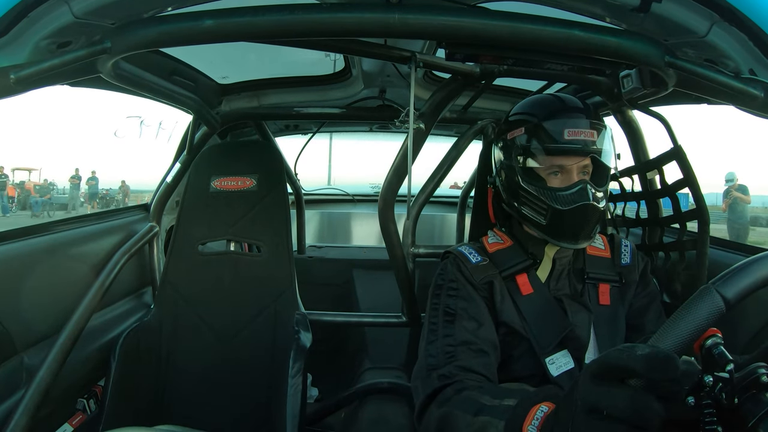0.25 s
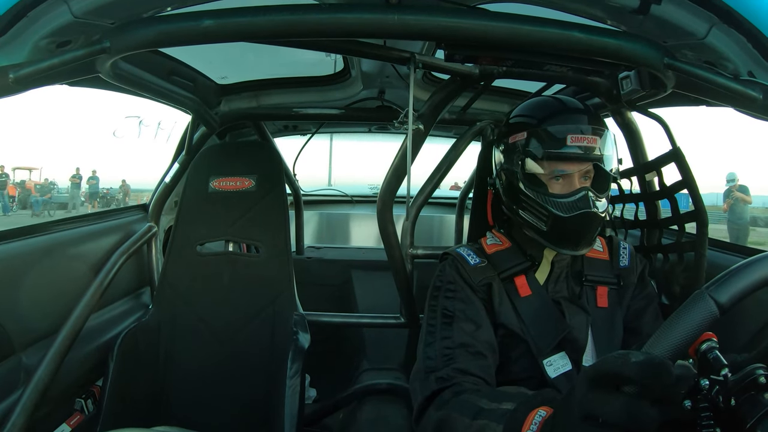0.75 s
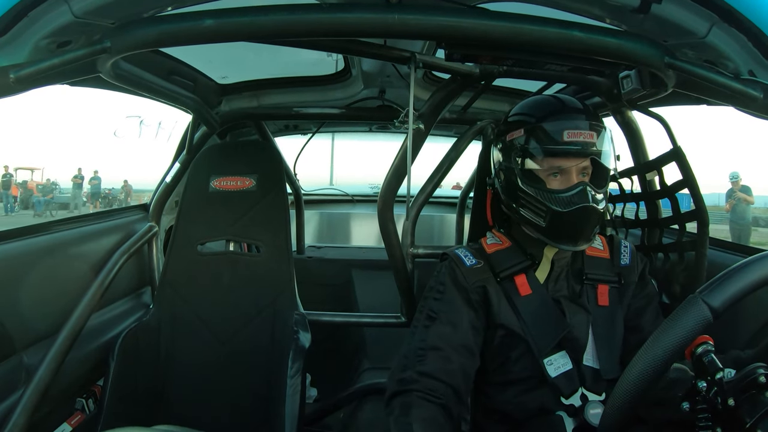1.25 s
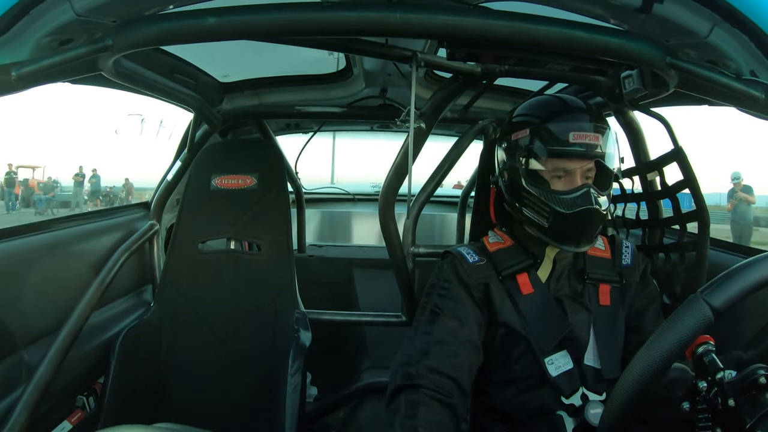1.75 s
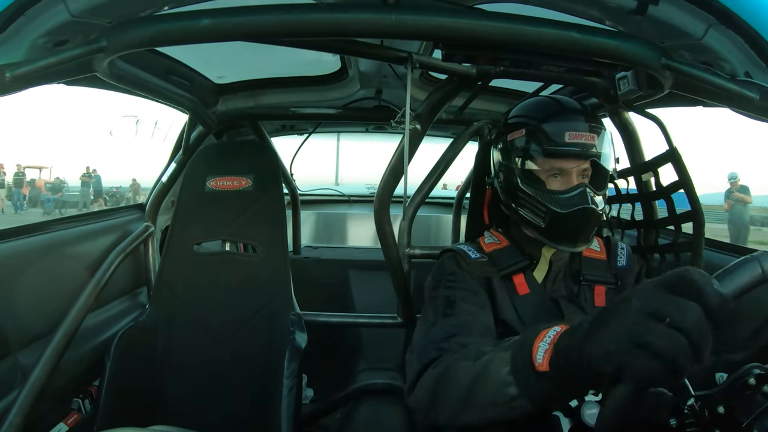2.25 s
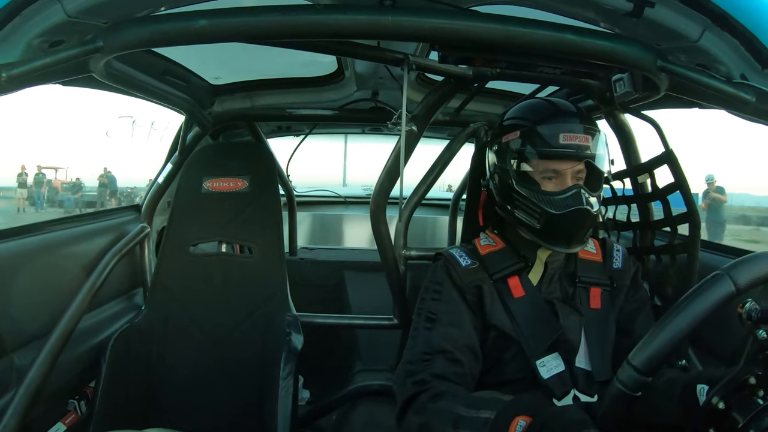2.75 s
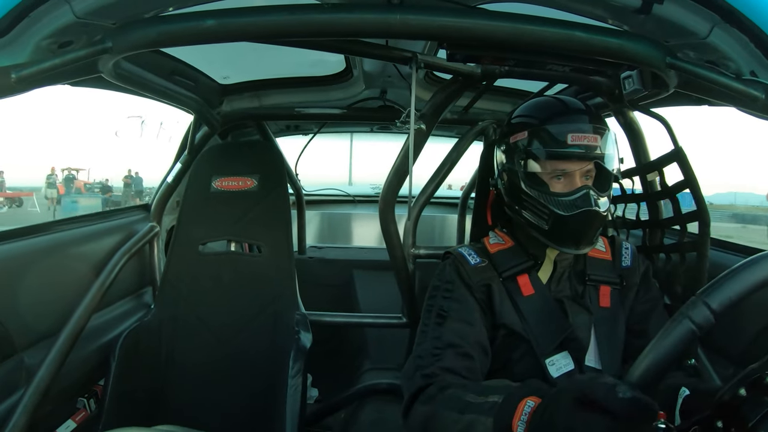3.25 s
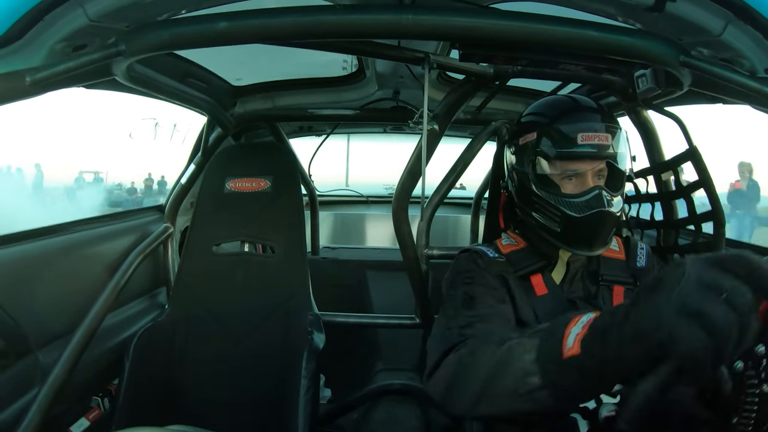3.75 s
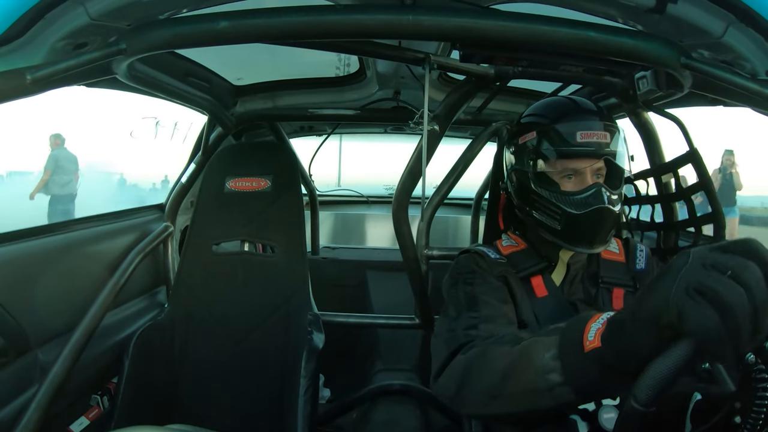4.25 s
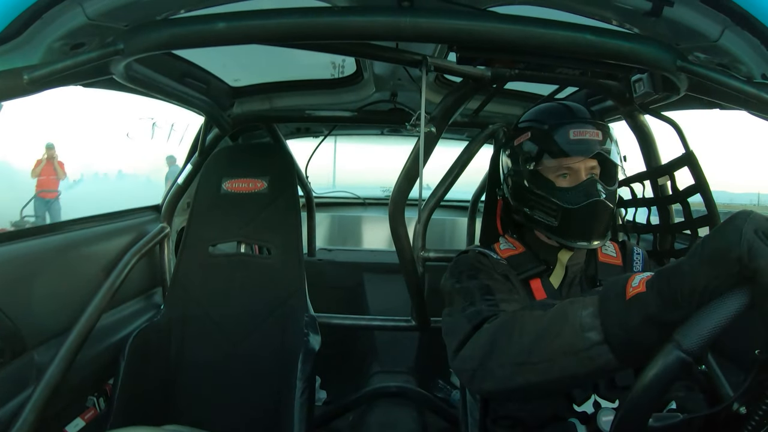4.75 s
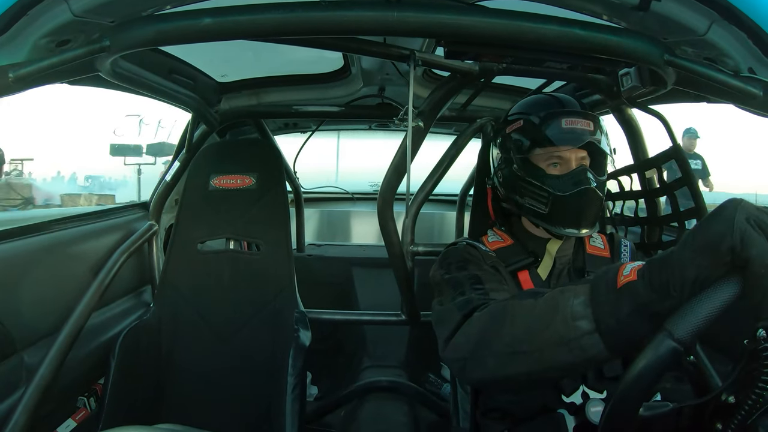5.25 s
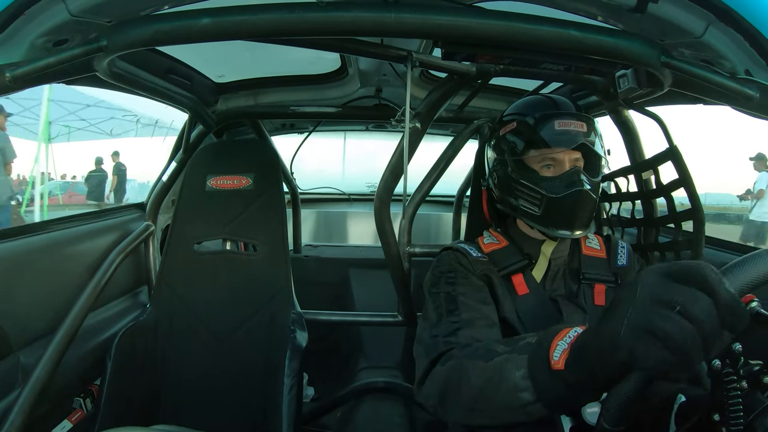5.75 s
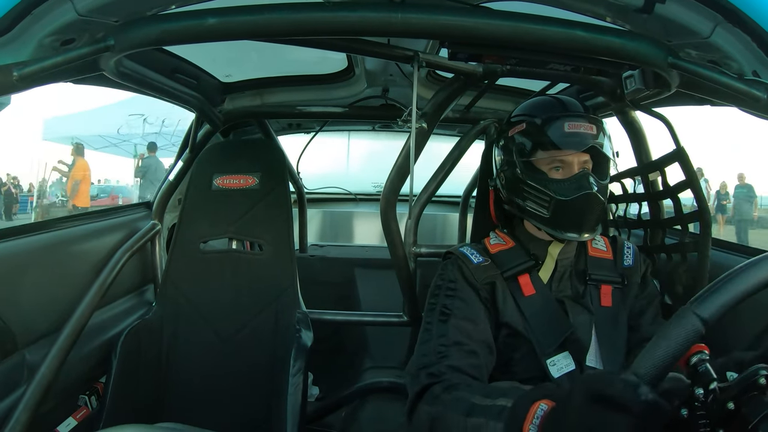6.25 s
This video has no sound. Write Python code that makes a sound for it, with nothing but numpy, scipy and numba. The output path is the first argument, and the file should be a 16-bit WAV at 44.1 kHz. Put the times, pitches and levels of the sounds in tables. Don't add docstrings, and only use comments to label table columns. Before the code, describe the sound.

A small microphone in a bare, ringing car cabin catches a lumpy V8 revving up fast, turbo whistle sweeping above it. Heavy floor jolts, snapping trim and hissing tyres join as revs dip and build again. After a last surge comes the lift: clustered rattles, a chirp and rush of air, falling revs, soft exhaust burbles, then uneven idle with faint pump whirr and a falling whistle.

```python
import sys
import numpy as np
from scipy import signal
from scipy.fft import rfft, irfft
from scipy.io import wavfile
from scipy.ndimage import uniform_filter1d
from numba import njit

SR = 44100
rng = np.random.default_rng(int(sys.argv[2]) if len(sys.argv) > 2 else 0)


def gain_from_db(level_db):
    decades = np.asarray(level_db, float) / 20
    return 10 ** decades


def file_out(sig):
    cols = np.atleast_2d(sig).T
    lim = np.clip(cols, -1, 1)
    pcm = np.round(lim * 32767).astype(np.int16)
    wavfile.write(sys.argv[1], SR, pcm)


N = 286650


def noise():
    return rng.standard_normal(N)


def unit(x):
    return x / np.sqrt(np.mean(x ** 2))


def curves(table):
    s, *columns = np.transpose(table)
    return [np.interp(np.arange(N) / SR, s, c) for c in columns]


def gate(table, fade_s=0.016):
    t = np.arange(N) / SR
    return np.clip(np.minimum(t - table[0][0], table[-1][0] - t) / fade_s, 0, 1)


def walk(rate):
    hold = int(SR / rate)
    levels = np.repeat(rng.standard_normal(N // hold + 1), hold)
    return 1.3 * uniform_filter1d(uniform_filter1d(levels, hold), hold)[:N]


@njit
def band(x, hz, width):
    y, b, l = np.empty(len(x)), 0., 0.
    for i in range(len(x)):
        g, k = np.tan(np.pi * hz[i] / SR), width / hz[i]
        v = (b + g * (x[i] - l)) / (1 + g * (g + k))
        b, l, y[i] = 2 * v - b, l + 2 * g * v, k * v
    return y


def ring(x, hz, width):
    return band(x, np.full(len(x), float(hz)), float(width))


def coloured(spectrum, flicker_db, rate):
    hz, db = np.transpose(spectrum)
    octave = np.log2(np.maximum(np.fft.rfftfreq(N, 1 / SR), 1))
    shaped = rfft(noise()) * gain_from_db(np.interp(octave, np.log2(hz), db, left=-120, right=-120))
    out = 0
    for centre in np.arange(np.log2(hz[0]), np.log2(hz[-1]) + .5, .5):
        part = irfft(shaped * np.clip(1 - 2 * abs(octave - centre), 0, 1), N)
        out = out + part * gain_from_db(flicker_db * walk(rate))
    return unit(out)


# time [s], load [dB], airflow [dB].
EFFORT_CURVE = [(0.04, -18, -57), (0.2, -17.5, -56), (0.68, -16.5, -55), (0.91, -15.5, -52.5),
                (1.2, -14.5, -52), (1.51, -14, -45), (1.92, -16, -51), (2.12, -16, -49.5),
                (3.17, -16.5, -50), (3.74, -15.5, -48), (4.32, -16.5, -50), (4.34, -18, -52.5),
                (4.52, -25.5, -46.5), (4.87, -31.5, -55.5), (4.94, -38.5, -59), (5.69, -29, -60),
                (6.06, -28.5, -58.5), (6.42, -30, -63)]


def effort(full_db, per_load_db, per_air_db):
    load_db, air_db = curves(EFFORT_CURVE)
    return full_db + per_load_db * (load_db + 15) + per_air_db * (air_db + 48)


def hiss_level():
    return effort(-45, 0.022, 0.94)


# time [s], four-stroke cycle rate [Hz].
CYCLE_RATE = [(0.0, 26.5), (0.27, 27.7), (0.6, 28.7), (0.72, 30.0), (0.9, 36.6), (1.27, 45.8), (1.36, 47.8),
              (1.53, 49.2), (1.6, 42.6), (1.78, 41.0), (2.06, 32.2), (2.27, 31.1), (2.5, 35.1),
              (2.83, 38.3), (3.15, 38.7), (3.62, 40.6), (4.1, 46.5), (4.18, 45.9), (4.42, 42.0),
              (4.68, 25.5), (5.03, 16.2), (6.5, 17.3)]


def speed():
    late_s = np.maximum(np.arange(N) / SR - 5.03, 0)
    hunt_hz, period_s, fade_s = 2.4, 1.17, 2
    return curves(CYCLE_RATE)[0] - hunt_hz * np.sin(2 * np.pi * late_s / period_s) * np.exp(-late_s / fade_s)


def trend(hz, window):
    return uniform_filter1d(np.gradient(np.log(hz)) * SR, size=window)


def raggedness(hz):
    return np.clip(-trend(hz, SR // 4) - .7, 0, 1)


def crank(hz):
    cycle = np.cumsum(hz * (1 + (.003 + .06 * raggedness(hz)) * walk(25))) / SR
    loud_firing_s = 3.0685
    return cycle - cycle[int(loud_firing_s * SR)] % 1


def pump():
    out = 0
    for hz, width_hz, db in ((2610, 700, -54), (1360, 140, -60)):
        whirr = unit(ring(ring(noise(), hz, width_hz), hz, width_hz))
        out = out + gain_from_db(db + 1.7 * walk(27)) * whirr
    return out


# time [s], level [dB].
FLOOR_JOLTS = [
    (.81, -27.5),
    (1.54, -15.5),
    (1.99, -17),
    (2.39, -17),
    (3.17, -28),
    (3.73, -18.5),
    (4.291, -26.5),
    (4.58, -12.5),
    (4.85, -45),
    (6.1, -33),
]


def floor_pan():
    t = np.arange(N) / SR
    rolling_s, standing_db_per_s, rise_s, fall_s = 1, 16, 0.034, 0.11
    level = gain_from_db(-31 + standing_db_per_s * np.minimum(t - rolling_s, 0))
    for s, db in FLOOR_JOLTS:
        level = level + gain_from_db(db) * np.exp(-np.maximum((s - t) / rise_s, (t - s) / fall_s))
    return level * unit(ring(ring(noise(), 38, 40), 38, 53))


FIRING_SIZE = (1.5, .3, .8, 1.0, .2, .8, .35, .25)


def firings(cycle):
    slot = (8 * cycle).astype(int)
    return slot, np.array(FIRING_SIZE)[slot % 8]


# frequency [Hz], level per Hz [dB].
ROAR_COLOUR = [(600, -33.5), (800, -1), (920, -3.5), (1230, -5), (1450, -4.5), (1900, -10), (2350, -14),
               (2750, -14), (3200, -25.5), (5000, -38)]
# frequency [Hz], level per Hz [dB].
HISS_COLOUR = [(3000, 1), (4200, -1.5), (4900, -6), (6000, -4), (8000, -11), (9200, -11), (9700, -26),
               (10700, -20), (11600, -31), (14200, -36)]


def flow(cycle):
    size = firings(cycle)[1]
    puff = size * np.exp(-(8 * cycle % 1) / 0.61)
    shake = walk(30)
    roar = unit(coloured(ROAR_COLOUR, 1.0, 16) * (4.6 + puff) * gain_from_db(1.1 * shake))
    grit = (rng.random(N) < 400 / SR) * gain_from_db(2.8 * rng.exponential(size=N))
    grit = np.convolve(grit, np.exp(-np.arange(200) / 30.0))[:N]
    hiss = unit(coloured(HISS_COLOUR, 0.76, 28) * (1 + 0.069 * grit) * gain_from_db(shake))
    return gain_from_db(effort(-32, 0.52, 0.4)) * roar + gain_from_db(hiss_level()) * hiss


def buzz(cycle):
    turn = np.diff((2 * cycle).astype(int), prepend=0) > 0
    hit = .6 * turn + .5 * (rng.random(N) < 320 / SR)
    hit = hit * gain_from_db(4 * np.minimum(rng.exponential(size=N), 4))
    taps = np.convolve(hit, np.hanning(36))[:N] * noise()
    return gain_from_db(2 * hiss_level() + 24) * unit(ring(taps, 11500, 9000))


# time [s], peak [dB].
TRIM_SNAPS = [(0.8675, -50), (1.1673, -47), (1.2277, -51.5), (1.2526, -54), (1.3478, -45), (1.4364, -41),
              (1.437, -41.5), (1.4902, -44.5), (1.501, -51), (1.566, -47.5), (1.6416, -46), (1.707, -47.5),
              (1.7843, -46), (1.982, -47), (1.9974, -41.5), (2.016, -42.5), (2.178, -44), (2.2168, -42),
              (2.2814, -43.5), (2.4065, -41), (2.4948, -47.5), (2.705, -46), (2.868, -46.5), (2.941, -50),
              (3.018, -50), (3.0997, -47), (3.1903, -48), (3.2848, -51), (3.404, -47), (3.512, -45.5),
              (3.5968, -45), (3.6873, -42.5), (3.7315, -45.5), (3.7513, -44), (4.174, -55.5),
              (4.205, -42.5), (4.228, -44), (4.305, -53.5), (4.3271, -48.5), (4.346, -52), (4.3625, -45.5),
              (4.3843, -43.5), (4.4035, -42), (4.42, -42), (4.4429, -44.5), (4.4862, -43), (4.51, -44),
              (4.528, -43), (4.588, -43), (4.6444, -41), (4.7492, -50.5), (4.8546, -50), (4.8947, -59.5),
              (5.691, -66), (5.7092, -56.5), (5.9539, -56.5), (6.2083, -56), (6.369, -56)]


def snaps():
    s, db = np.transpose(TRIM_SNAPS)
    hits = np.zeros(N)
    hits[(s * SR).astype(int)] = gain_from_db(db + 5)
    decay_ms = .7
    hits = np.convolve(hits, np.exp(-np.arange(220) / SR * 1000 / decay_ms))[:N] * noise()
    return ring(hits, 9600, 12000)


# time [s], peak [dB], ring frequency [Hz].
METAL_KNOCKS = [(1.353, -26.5, 4440), (1.436, -24.5, 4500), (1.508, -34, 4930), (1.689, -36, 5560),
                (1.883, -33, 4600), (1.996, -32, 5620), (2.0158, -31, 4510), (2.151, -35.5, 5980),
                (2.215, -30.5, 4660), (2.495, -30.5, 6000), (2.7047, -32, 5770), (3.3278, -35, 5970),
                (3.7312, -33.5, 6110), (3.7534, -33.5, 5890), (4.3285, -44, 5800), (4.349, -34.5, 4500),
                (4.3842, -32.5, 6650), (4.401, -36.5, 4500), (4.42, -32.5, 5900), (4.447, -33, 6060),
                (4.464, -35, 5550), (4.487, -30, 6080), (4.508, -29.5, 6000), (4.528, -34.5, 5400),
                (4.589, -31.5, 5120), (4.642, -28, 5840), (4.7484, -36.5, 5500), (5.692, -40, 2400),
                (6.1355, -44.5, 5900), (6.3702, -41, 5840)]


def rattles():
    out, t = np.zeros(N), np.arange(2200) / SR
    swell_ms, halo_ms, halo_db = 1.5, 13, -11
    peak_s = t[-1] / 2
    from_peak_ms = (t - peak_s) * 1000
    halo = gain_from_db(halo_db) * np.exp(-(from_peak_ms / halo_ms) ** 2)
    for s, db, hz in METAL_KNOCKS:
        long_ms = swell_ms * gain_from_db(max(db + 30.5, 0))
        burst = rng.standard_normal(len(t)) * (np.exp(-(from_peak_ms / long_ms) ** 2) + halo)
        knock = 0.53 * ring(burst, 7800, 3000) + 1.1 * ring(burst, hz, 1500)
        i = int((s + swell_ms / 700 - peak_s) * SR)
        out[i:i + len(t)] += (gain_from_db(db - 0.5) * knock)[:N - i]
    return signal.sosfilt(signal.butter(2, 10400, fs=SR, output="sos"), out)


def tone(table, wobble, overtones_db=()):
    hz, db = curves(table)
    phase = 2 * np.pi * np.cumsum(hz * (1 + wobble * walk(150))) / SR
    wave = sum(gain_from_db(d) * np.sin((k + 1) * phase) for k, d in enumerate((0, *overtones_db)))
    return np.sqrt(2) * gate(table) * gain_from_db(db + 2.0 * walk(40)) * wave


# time [s], frequency [Hz], level [dB].
GEAR_MESH = [
    (1.9, 305.6, -25),
    (2.2, 298, -19.5),
    (2.32, 312, -29),
    (3.0, 315.8, -24.5),
]
SLIPPING_CONVERTER = [
    (0.25, 328.4, -21),
    (0.58, 336, -22),
    (0.68, 338, -30),
]
SPINNING_SHAFT = [
    (2.45, 62.45, -29),
    (2.8, 62.6, -26),
    (3.3, 63.7, -21),
    (3.75, 80, -31.5),
]
HOPPING_WHEELS = [
    (3.85, 28.38, -33),
    (4.4, 26.9, -19),
    (4.6, 26.7, -27),
]


def driveline():
    gears = tone(GEAR_MESH, 0.002) + tone(SLIPPING_CONVERTER, 0.0096)
    return gears + tone(SPINNING_SHAFT, .004) + tone(HOPPING_WHEELS, 0.0019, (-3,))


def whistle(table, width, overtones_db=()):
    hz, db = curves(table)
    out = 0
    for k, d in enumerate((0, *overtones_db), 1):
        air = band(band(noise(), k * hz, k ** .5 * width), k * hz, k ** .5 * width)
        out = out + gain_from_db(d + 1.6 * walk(70)) * unit(air)
    return gate(table) * gain_from_db(db) * out


# time [s], frequency [Hz], level [dB].
WHISTLE_UP = [(.43, 1200, -50), (.485, 1350, -41), (.56, 1800, -45), (.67, 2280, -41), (.75, 2650, -47),
              (.85, 2850, -49), (1.1, 3500, -54), (1.36, 4250, -55), (1.42, 4400, -64)]
WHISTLE_DOWN = [(4.8, 3650, -66), (5.17, 3600, -67), (5.28, 3570, -56), (5.4, 3450, -63), (5.6, 3020, -58),
                (5.8, 2800, -61), (5.97, 2680, -58), (6.15, 2450, -59), (6.5, 2250, -60)]
# time [s], frequency [Hz], level [dB].
VALVE_CHIRP = [
    (4.52, 1440, -56),
    (4.545, 1390, -45),
    (4.61, 1280, -42),
    (4.655, 1210, -40),
    (4.725, 1125, -44),
    (4.77, 1100, -62),
]
VALVE_AIR = [
    (4.33, 8100, -60),
    (4.45, 8200, -57),
    (4.62, 8100, -53),
    (4.72, 7860, -64),
]


def turbo():
    spool = whistle(WHISTLE_UP, 240., (-15,)) * gain_from_db(1.5 * walk(30) + 1)
    spool = spool + whistle(WHISTLE_DOWN, 260.) * gain_from_db(4 + 3 * walk(25))
    flutter_hz = 150 * (1 + .2 * walk(40))
    flutter = 1 + .45 * np.sin(2 * np.pi * np.cumsum(flutter_hz) / SR)
    chirp = gain_from_db(7) * flutter * whistle(VALVE_CHIRP, 250., (-6, -6, -13, -17))
    return spool + chirp + whistle(VALVE_AIR, 2600.)


# time [s], peak [dB], panel
# note [Hz], swell [ms].
OVERRUN_BURBLES = [(3.981, -17.5, 89, 98), (4.302, -18, 355, 66), (4.47, -19, 207, 42),
                   (4.521, -19, 141.6, 69), (4.61, -15, 211, 34), (4.63, -24, 413, 28),
                   (4.781, -18.5, 177, 44), (4.799, -14, 93, 50), (5.2, -18.5, 100.4, 66),
                   (5.31, -28.5, 202, 72), (5.399, -16.5, 91.7, 69), (5.521, -25.5, 139, 89),
                   (5.648, -29.5, 341, 55), (5.7, -36, 764, 12)]


def burbles():
    t, wobble = np.arange(N) / SR, 0.44 * walk(30)
    out = 0
    for s, db, hz, ms in OVERRUN_BURBLES:
        swell = np.exp(-((t - s) * 1000 / ms) ** 2)
        out = out + gain_from_db(db) * swell * np.sin(2 * np.pi * hz * (t - s) + wobble)
    return out


# frequency [Hz], width [Hz], level [dB].
CABIN_NOTES = [(45.6, 73, -6.5), (73, 11, 0.5), (88, 12, 2), (147.3, 10.7, 6), (206.6, 11.9, 1.5),
               (299.8, 29, -2.5), (351, 11.3, 1), (417.3, 15.2, -2), (472.4, 39, -7), (569.7, 27.7, -10),
               (661.3, 55, -11), (925, 1400, -34.5), (1410, 350, -27)]


def cabin(x, throttle_db):
    rings = [(-1) ** k * gain_from_db(db) * ring(x, hz, w) for k, (hz, w, db) in enumerate(CABIN_NOTES)]
    low = sum(rings[:5]) + gain_from_db(throttle_db / 3) * sum(rings[6:8])
    high = sum(rings[8:], rings[5])
    muffled = signal.sosfilt(signal.butter(2, 520, fs=SR, output="sos"), low)
    open_part = signal.sosfilt(signal.butter(3, 1500, fs=SR, output="sos"), high)
    return (muffled + gain_from_db(throttle_db) * open_part) / np.sqrt(np.mean((low + high) ** 2))


# frequency [Hz], width [Hz], level [dB].
SHELL_NOTES = [(66.3, 17.7, 18.5), (94.7, 6.8, 16.5), (139.8, 40.5, 0.5), (180, 26, -4), (197.5, 31.3, -3),
               (214.5, 43, -9.5), (251, 66, -18), (352, 47, -8.5), (310, 100, -15.5), (374, 16, -19.5)]


def shell(hz):
    return sum(gain_from_db(db) / (1 + (2 * (hz - centre) / w) ** 2) ** 1.5 for centre, w, db in SHELL_NOTES)


# time [s], depth [dB].
IGNITION_STUMBLES = [(3.139, -10), (.9, -5), (1.135, -7), (1.4, -5), (1.85, -2), (2.08, -8), (2.16, -6),
                     (2.25, -8), (2.345, -8), (2.42, -7), (4.41, -7), (5.135, -10), (5.255, -10),
                     (5.455, -10)]


def stumbles():
    t = np.arange(N) / SR
    return sum(db * np.exp(-((t - s) * 1000 / 9) ** 2) for s, db in IGNITION_STUMBLES)


def order(k, cycle):
    phase = np.angle(np.fft.fft(FIRING_SIZE))[k % 8] if k < 14 else np.pi * (1 - .12 * k)
    return np.sqrt(2) * np.cos(2 * np.pi * k * cycle + phase)


STRONG_ORDERS = (5, 3, 4, 8, 2, 6)
# level at full load [dB], follow [dB per load dB], tilt [dB per Hz above the knee],
# change while revs surge [dB], change while they fall [dB].
STRONG_LEVELS = [(-9, 0.54, -0.5, -3.5, -1), (-29.5, 2.2, 5, -6, -3.5), (-22.5, 0.7, 2, 3.5, 0.5),
                 (-8, 0.98, -0.7, -0.5, -1), (-39, 4.3, 1.5, 1.5, 2), (-26.5, 1.1, 2, 12, 10)]


def strong_orders(hz, cycle, surge, coast, ragged):
    above_knee = np.clip(hz - 40.8, 0, 3.1)
    sway_db = 0.4 + 1.6 * surge + 3.2 * coast + 20 * ragged
    out = 0
    for k, (full_db, follow, tilt, surge_db, coast_db) in zip(STRONG_ORDERS, STRONG_LEVELS):
        db = effort(full_db, follow, 0) + surge_db * surge + coast_db * coast
        db = db + tilt * above_knee - 7 * ragged + sway_db * np.minimum(walk(40), .22)
        if k == 5:
            db = db - 2.8 * np.maximum(21 - hz, 0)
        out = out + gain_from_db(db) * shell(k * hz) * order(k, cycle)
    return out


# order, level [dB].
UPPER_ORDERS = [(1, -14.5), (7, -2.5), (9, 4.5), (10, 6), (11, -6), (12, -5), (13, 6), (14, 2.5), (15, -9),
                (16, 5.5), (17, 4), (18, 6), (19, -24.5), (20, -8.5), (21, 6.5), (22, -24), (23, -16),
                (24, 0), (25, -19), (26, -19.5), (27, -8), (29, -3.5), (32, 5)]


def engine(hz, cycle):
    rest_db, misfire_db = effort(-16, 0.95, .01), effort(-17, 0.44, 0.02)
    throttle_db = effort(3.23, 0.67, 0.033)
    ragged, swing = raggedness(hz), trend(hz, SR // 10)
    surge, coast = np.clip(swing, 0, 1), np.clip(-swing, 0, 1)
    rest_db = rest_db - 2 * surge - 6 * coast
    misfire_db = misfire_db + 2.5 * (surge + coast)
    lead = strong_orders(hz, cycle, surge, coast, ragged)
    rest = sum(gain_from_db(db + 3.6 * walk(6)) * order(int(round(k)), cycle) for k, db in UPPER_ORDERS)
    rest = gain_from_db(rest_db + 7 * ragged) * cabin(rest, throttle_db)
    slot, size = firings(cycle)
    fired = np.diff(slot, prepend=0) > 0
    uneven = fired * rng.standard_normal(slot[-1] + 1)[slot] * size
    uneven = uneven / np.sqrt(hz) + 0.012 * noise()
    steady_db = -2.5 * (1 - np.maximum(surge, coast))
    chance = gain_from_db(misfire_db + 0.5 * ragged) * cabin(uneven, throttle_db + steady_db)
    bark = unit(ring(ring(1. * (fired & (slot % 8 == 1)), 659, 286), 659, 286))
    bark = gain_from_db(-26 + rest_db + throttle_db + 1.5 * np.minimum(hz - 29, 0)) * bark
    return gain_from_db(stumbles()) * (lead + rest - bark + chance)


def scene():
    hz = speed()
    cycle = crank(hz)
    background = pump() + floor_pan() + flow(cycle)
    metal = buzz(cycle) + snaps() + rattles()
    mix = background + metal + driveline() + turbo() + burbles() + engine(hz, cycle)
    return mix[None, :] * np.minimum(np.arange(N) / 200, 1)


def roll_off(x):
    return signal.sosfilt(signal.butter(12, 15200, fs=SR, output="sos"), x)


def record(dry):
    ceiling = .95
    mix = ceiling * np.tanh(0.98 * dry / ceiling)
    return roll_off(mix)


dry = scene()
out = record(dry)
file_out(out)
```